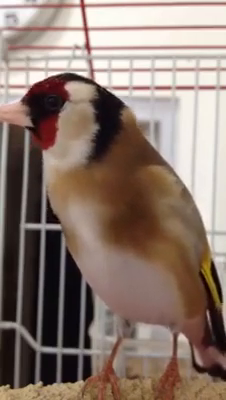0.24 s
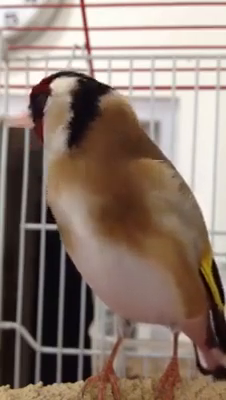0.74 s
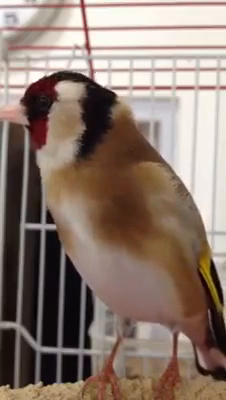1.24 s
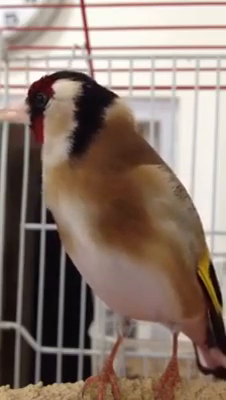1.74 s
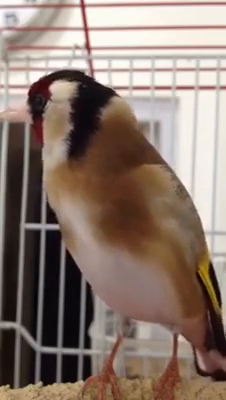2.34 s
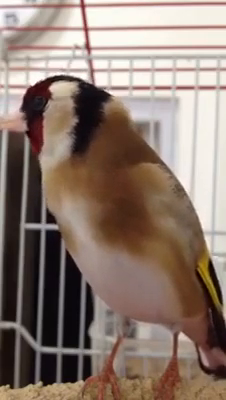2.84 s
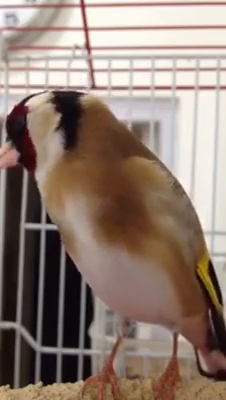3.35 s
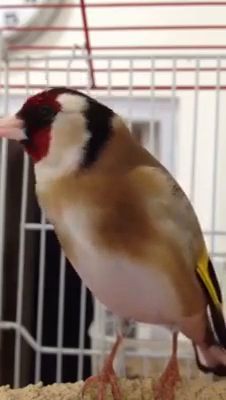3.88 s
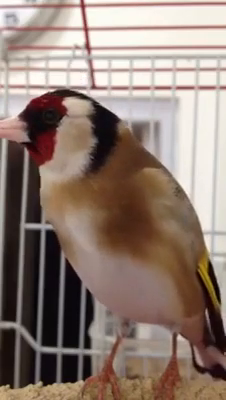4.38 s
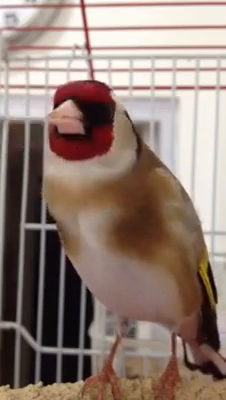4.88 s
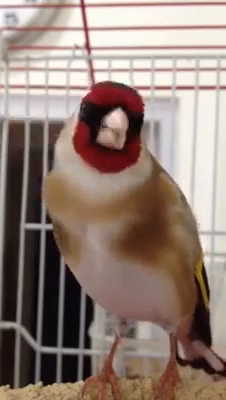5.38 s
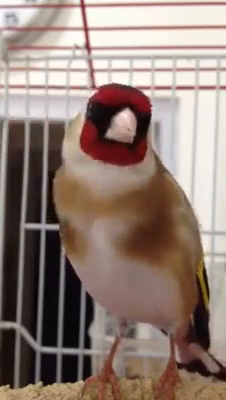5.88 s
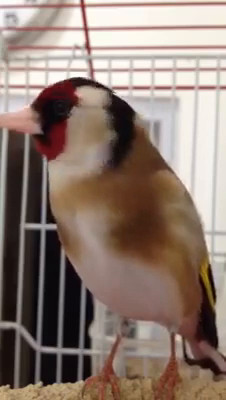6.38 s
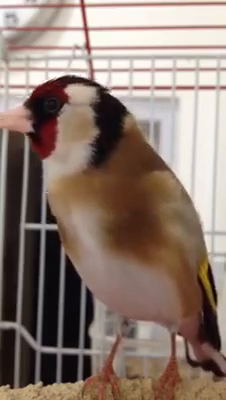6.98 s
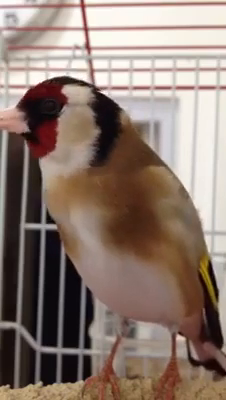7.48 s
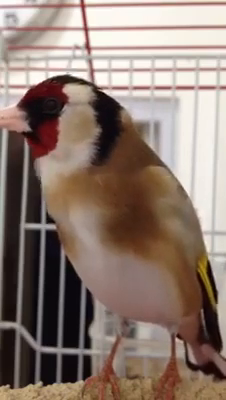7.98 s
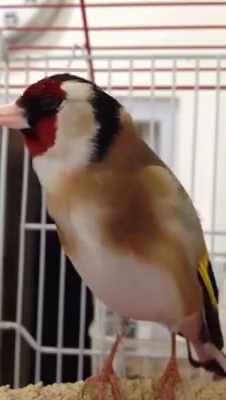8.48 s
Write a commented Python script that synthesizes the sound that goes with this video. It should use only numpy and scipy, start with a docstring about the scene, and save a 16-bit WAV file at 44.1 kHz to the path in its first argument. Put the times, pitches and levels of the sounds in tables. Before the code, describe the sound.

Close to the microphone in a small, hard-walled room, a caged goldfinch sings. A few chirps lead into paired twitters, sliding high whistles, a buzz, fast chattering and whip-like notes. After a sparse pause come a soft mew and creaky rattle, then rising flourishes, quick seesaw chirps, a second buzz and more twittering. Soft room noise and faint low hums lie underneath.

```python
"""Quick gliding whistles, rasps and buzzing trills: a caged goldfinch sings close by in a small room.
Both sides of its syrinx sound: whistles are nearly pure gliding tones, rasps are overtones picked
out by a throat resonance, and trills are fast trains of short chirps. Nearby walls return the notes
as discrete reflections and a decaying tail. Two brief level high tones sound among them. Under all lie
filtered room noise, a faint hiss and two low hums of wavering partials that swell and fade."""
import sys
import numpy as np
from scipy import signal
from scipy.fft import rfft, irfft, next_fast_len
from scipy.io import wavfile

SR = 44100
rng = np.random.default_rng(int(sys.argv[2]) if len(sys.argv) > 2 else 0)


def to_wav(s):
    """Save 16-bit WAV."""
    ch = np.atleast_2d(s).T  # columns
    pcm = np.round(np.clip(ch, -1, 1) * 32767)  # PCM
    wavfile.write(sys.argv[1], SR, pcm.astype(np.int16))


N = 384993
TIME = np.arange(N) / SR

# The strokes of a short rising chirp, sung alone and in pairs; delay_s runs to the loudest moment:
# delay_s, rise_s, fall_s, first_hz, peak_hz, last_hz, level_db, roughness (share of pitch)
WHIT = [(0.00027, .01, .009, 3480, 3950, 4250, 1.5, .012),
        (-.009, .014, .007, 2350, 3400, 3950, -7.5, .045),
        (-.005, .009, .006, 1600, 2900, 4200, -15, 0.063)]


def gain_of(db):
    """Level in decibels as an amplitude ratio."""
    return 10 ** (np.asarray(db) / 20)


def evened(x):
    """Normalization of signal power: scales to rms 1."""
    return x / np.sqrt(np.mean(x ** 2) + 1e-20)


def read(points, hz):
    """Interpolation of a spectrum along a logarithmic frequency axis."""
    f, value = np.transpose(points)
    return np.interp(np.log(hz + 1), np.log(f + 1), value)


def tint(x, points):
    """Linear filtering: weights the spectrum by (frequency_hz, gain_db) points."""
    size = next_fast_len(N + SR, True)
    gain = gain_of(read(points, np.fft.rfftfreq(size, 1 / SR)))
    return irfft(rfft(x, size) * gain, size)[:N]


def add(mix, s, sound):
    """Superposition: adds a sound into the mix from time s on."""
    part = mix[max(round(s * SR), 0):][:len(sound)]
    part += sound[:len(part)]


def wobble(count, hz):
    """Low-passed random motion of about rms 1, weakening above hz."""
    size = next_fast_len(count + 1024, True)
    f = np.fft.rfftfreq(size, 1 / SR)
    lowpass = 1 / np.hypot(1, (f / hz) ** 2)
    return evened(irfft(rfft(rng.standard_normal(size)) * lowpass, size))[:count]


def background(trim_db=0.5, hiss_db=-73):
    """Stationary noise shaped in spectrum: dull room noise that slowly swells, over a white hiss."""
    # Spectrum of the room noise, relative: frequency_hz, density_db (per Hz)
    room_tone = [(30, -32), (70, -17), (120, -10.5), (200, 0), (350, -5), (600, -11), (2500, -20.5),
                 (6000, -34), (10000, -46)]
    # Its swell, before the trim: time_s, level_db
    room_swell = [(0, -51), (2.2, -46), (3.7, -50), (5, -44.5), (5.9, -48.5), (7.7, -41.5), (8.73, -41.5)]
    noise = evened(tint(rng.standard_normal(N), room_tone))
    level_db = np.interp(TIME, *np.transpose(room_swell)) + trim_db
    hiss = gain_of(hiss_db) * rng.standard_normal(N)
    return noise * gain_of(level_db) + hiss


def last_ring(hz=4700, width_hz=400, db=-43, t60=1.0):
    """Exponential decay of a narrow noise band: the room still rings from an earlier phrase."""
    ring = wobble(N, width_hz) * np.sin(2 * np.pi * hz * TIME)
    return np.sqrt(2) * ring * gain_of(db - 60 * TIME / t60)


def gesture(rise, fall, first_hz, peak_hz, last_hz, rough,
            core=0.36, jitter_hz=700, flutter=11, hold=.7, level_span=.015):
    """Frequency and amplitude modulation, as by one push of air: swell, gliding pitch and phase."""
    t = np.arange(-rise, fall, 1 / SR)
    u = np.where(t < 0, t / rise, t / fall)  # -1 at the start, 0 at the loudest, 1 at the end

    # a level tone stays even, a glide peaks briefly
    width = core + hold * np.exp(-abs(np.log(last_hz / first_hz)) / level_span)
    swell = (1 - u ** 8) / (1 + (u / width) ** 2)

    shake = np.tanh(flutter * rough)  # a rough voice also flutters in strength
    swell = swell * (1 + shake * wobble(len(t), jitter_hz / 2)) / np.hypot(1, shake)

    glide = np.interp(u, [-1, 0, 1], [first_hz, peak_hz, last_hz])
    hz = glide * (1 + rough * wobble(len(t), jitter_hz))
    return np.sqrt(2) * swell, glide, 2 * np.pi * np.cumsum(hz) / SR


def overtones(hz, phase, colour, count):
    """Harmonic series above the fundamental, each partial as strong as colour(Hz) says."""
    return sum(colour(k * hz) * (k * hz < SR / 2) * np.sin(k * phase) for k in range(2, count + 1))


def whistle(s, rise, fall, first_hz, peak_hz, last_hz, db, rough, overtone_db=-32, air_db=-42,
            rough_air=.5, half_db=-45, bright_hz=4700, bright_db=11):
    """Nearly sinusoidal glide with a subharmonic; high notes gain overtones, rough notes leak hiss."""
    swell, hz, phase = gesture(rise, fall, first_hz, peak_hz, last_hz, rough)
    brightness = np.clip(4 * np.log2(hz / bright_hz), 0, 1)  # full a quarter octave above bright_hz
    overtone = gain_of(overtone_db + bright_db * brightness)
    half_pitch = gain_of(half_db) * np.sin(phase / 2)
    tone = np.sin(phase) + half_pitch + overtones(hz, phase, lambda f: overtone, count=4)
    air = (gain_of(air_db) + rough_air * rough) * rng.standard_normal(len(hz))
    return s - rise, gain_of(db) * swell * (tone + air)


def rasp(s, rise, fall, first_hz, peak_hz, last_hz, db, rough, throat_hz, width_hz=650,
         root_db=-3.5, octave_db=8, top_db=-33, rough_air=.95):
    """Source and resonator: the syrinx claps shut each cycle, the throat picks out overtones."""
    swell, hz, phase = gesture(rise, fall, first_hz, peak_hz, last_hz, rough, core=0.42)
    spread_hz = width_hz * (1 + 20 * rough)

    def throat(f):
        """Resonance curve over a weak floor."""
        return 1 / (1 + ((f - throat_hz) / spread_hz) ** 2) + gain_of(top_db)

    # the fundamental escapes the better, the higher it lies and the broader the resonance
    root_gain = gain_of(root_db + octave_db * np.log2(hz / throat_hz)) * np.sqrt(spread_hz / width_hz)
    air = rough_air * rough * rng.standard_normal(len(hz))
    tone = root_gain * np.sin(phase) + overtones(hz, phase, throat, count=11) + air
    return s - rise, gain_of(db) * swell * evened(tone) / np.sqrt(2)


def note(strokes, s, db, pitch_hz=None, length=1, bend=.6):
    """Superposed strokes, stretched and transposed together; rough strokes never bend twice alike."""
    shift = pitch_hz / strokes[0][4] if pitch_hz else 1  # the first stroke then peaks at pitch_hz
    for delay, rise, fall, first_hz, peak_hz, last_hz, stroke_db, rough, *throat in strokes:
        voice = rasp if throat else whistle
        start, end = shift * (1 + bend * rough * rng.standard_normal(2))
        yield voice(s + delay * length, rise * length, fall * length,
                    first_hz * start, peak_hz * shift, last_hz * end, db + stroke_db, rough, *throat)


def single_notes():
    """Transposition of gestures: each note at its own pitch and length, some kinds sung only once."""
    # The strokes of each kind of note, overlapping where both sides of the syrinx sound:
    # delay_s, rise_s, fall_s, first_hz, peak_hz, last_hz, level_db (on the note's level),
    # roughness (share of pitch), and for rasps throat_hz
    hook = [(0, .012, .022, 2700, 3800, 4000, 0, .015), (-.011, .014, .006, 1700, 2350, 3200, -11, .02)]
    croon = [(0, .05, .042, 2290, 2440, 2520, .5, .02), (-.003, .04, .04, 4650, 4700, 5000, -10, .04)]
    peal = [(0, .022, .036, 4400, 5080, 5560, 0, 0.031), (-.018, .008, .011, 3200, 4200, 5300, -1, .035),
            (-.016, .007, 0.02, 5750, 5400, 5350, -2.5, 0.024)]
    slur = [(0.00048, .052, .058, 4500, 3250, 2680, 0, 0.029)]
    whip = [(0.00014, .011, .016, 3050, 4110, 5600, 1.5, .028),
            (-.008, .008, .006, 1387, 3000, 4300, -14, .07),
            (.019, .017, .04, 5100, 4620, 5350, -8.5, .035)]
    peep = [(0, .018, .021, 1930, 2780, 3150, 0, .022)]
    squeak = [(-0.00029, .018, 0.022, 5650, 5450, 5450, 0, .045),
              (-0.00086, 0.0088, 0.014, 7700, 7300, 6600, -6.5, .022),
              (0, .012, .014, 6200, 6000, 5950, -9, .015, 12000)]
    tink = [(0, .01, 0.012, 5370, 3743, 3380, -0.051, 0.0042),
            (.001, .01, .019, 5000, 5610, 5220, -2.2, .023)]
    slide = [(0, .024, .02, 1950, 2609, 3200, 0, .008),
             (-.03, .034, .022, 1500, 1980, 2300, -12.5, .005, 3200),
             (.066, .044, .05, 3000, 3780, 5000, -9, .05)]
    mew = [(0, 0.084, 0.07, 1475, 2000, 2083, 0, .002, 4020),
           (-0.11, 0.011, .04, 1230, 1275, 1560, -5, .029, 4000),
           (.057, .049, 0.04, 2010, 2113, 2164, .5, 0.0029, 3860)]
    chuck = [(-0.00029, .012, .017, 3950, 4000, 2760, 0, 0.055),
             (-.003, .008, 0.0056, 1400, 3000, 4300, -11.5, 0.074)]
    upper_step = [(0, .018, 0.016, 4400, 4720, 4800, 0, .04),
                  (-.006, .012, .016, 4700, 4350, 4200, -6, .03)]
    lower_step = [(0, .018, .009, 3300, 3850, 4020, 1, 0.0081)]
    zit = [(0, .005, 0.014, 7400, 8000, 8000, 0, 0.1)]
    # When and how each kind is sung: time_s, level_db, pitch_hz (first stroke's peak), length_factor
    hooks = [(.662, -13.5, 3800, 1)]
    whits = [(.907, -14.5, 4030, 1.4), (8.088, -8.5, 3950, 1.2)]
    croons = [(1.524, -21, 2437, 1), (8.708, -16.5, 2437, 1)]
    peals = [(1.626, -9.5, 4556, 1.01), (1.806, -9, 5126, 1), (1.988, -10, 5146, 1.1)]
    slurs = [(1.729, -25, 3117, 1.1), (1.891, -20.5, 3350, 1)]
    whips = [(2.964, -11, 3945, 1.31), (3.197, -7.5, 4170, 0.91), (3.418, -8, 4110, 1)]
    peeps = [(3.074, -21, 2820, 1.12), (3.309, -20.5, 2765, 0.93), (8.211, -22.5, 3250, 1.8)]
    squeaks = [(3.145, -18, 5300, 0.98), (3.368, -15.5, 5570, 1.1), (7.249, -16.5, 5650, .9)]
    tinks = [(3.64, -12.5, 3790, 0.83), (3.704, -11, 3776, 1.02), (3.77, -11.5, 3684, 1.1),
             (3.841, -9, 3790, 1.09)]
    slides = [(4.284, -23, 2610, 1)]
    mews = [(4.733, -23.5, 2002, 1)]
    chucks = [(6.897, -14.5, 3930, 1.13), (7.106, -8.5, 4180, 0.77), (7.306, -14, 4035, 1.1)]
    upper_steps = [(6.954, -14.5, 4600, 1.13), (7.171, -12, 4720, 1), (7.365, -11, 4950, .9)]
    lower_steps = [(6.989, -5.5, 3820, 1), (7.184, -10.5, 3450, 0.98), (7.391, -5.5, 4014, .9)]
    zits = [(7.028, -19, 7800, 1), (7.229, -21, 8400, 1.2)]
    for strokes, rows in [(hook, hooks), (WHIT, whits), (croon, croons), (peal, peals),
                          (slur, slurs), (whip, whips), (peep, peeps), (squeak, squeaks),
                          (tink, tinks), (slide, slides), (mew, mews), (chuck, chucks),
                          (upper_step, upper_steps), (lower_step, lower_steps), (zit, zits)]:
        for row in rows:
            yield from note(strokes, *row)


def paired_notes():
    """Repetition of two-note syllables in runs, the second note a short gap after the first."""
    # The strokes of each note in a pair: delay_s, rise_s, fall_s, first_hz, peak_hz, last_hz,
    # level_db (on the note's level), roughness (share of pitch), and for rasps throat_hz
    chip = [(0.00027, .007, .005, 6100, 4100, 2800, 0.0021, .075),
            (-.001, .005, .012, 5600, 5350, 4700, -8.5, .07), (0, .006, .012, 7900, 7700, 7400, -23, .06)]
    chip_echo = [(0, .012, .017, 5100, 3860, 3280, 0, .03), (-.004, .008, .01, 3100, 2850, 2600, -15, .08)]
    sweep = [(-0.00017, .02, .03, 2650, 3950, 4750, .3, .026),
             (-.012, .011, .006, 1300, 2900, 4300, -9.5, .06),
             (.012, .016, .02, 4750, 4620, 4700, -9, .018)]
    lilt = [(0, .012, .018, 3050, 3380, 3900, 0.0031, 0.022)]
    scrape = [(0, .028, .024, 1780, 3100, 3850, 0, 0.092, 5500)]
    peak = [(0, .022, 0.012, 3007, 4494, 5550, 0, .025), (.011, .005, 0.0209, 4890, 3380, 2565, -8, 0.024),
            (.029, .007, .018, 4900, 3220, 2500, -9, .01)]
    tsip = [(0, .007, .019, 5250, 5000, 4940, 0, .04), (-.004, .004, .01, 7700, 7200, 6200, -11.5, .09),
            (-.003, .005, .009, 6200, 5850, 5600, -16, .04, 11800)]
    # The runs: time_s, first_level_db, gap_s (to the second note), second_level_db
    chatters = [(.748, -14.5, .011, -25), (2.41, -6.5, .016, -7.5), (2.473, -7.5, .016, -8),
                (2.538, -7, 0.014, -15), (2.598, -10, .015, -12), (2.659, -8, .018, -17),
                (2.721, -6, .019, -6.5), (2.786, -6, .016, -5.5), (2.857, -15, .017, -10.5)]
    twitters = [(1.025, -15.5, 0.032, -20.5), (1.118, -16, .036, -21), (1.214, -15, 0.03, -19.5),
                (1.305, -16.5, .027, -19.5), (1.396, -15, .03, -18.5), (8.298, -12.5, 0.034, -14.5),
                (8.393, -14, .029, -12.5), (8.482, -12, 0.033, -13.5), (8.579, -11.5, 0.033, -13.5)]
    flourishes = [(5.292, -29, 0.024, -8.5), (5.438, -15.5, .024, -8.5), (5.584, -19.5, .025, -9),
                  (5.73, -21.5, .026, -9)]
    seesaws = [(6.171, -11.5, .024, -13.5), (6.264, -8, .033, -13), (6.356, -7, .029, -15),
               (6.447, -9, .025, -13.5), (6.532, -9.5, .034, -9), (6.63, -7, .029, -7),
               (6.721, -11, .03, -8.5)]
    for first, second, rows in [(chip, chip_echo, chatters), (sweep, lilt, twitters),
                                (scrape, peak, flourishes), (WHIT, tsip, seesaws)]:
        for s, first_db, gap, second_db in rows:
            yield from note(first, s, first_db)
            yield from note(second, s + gap, second_db)


def room(x, near_db=-8, near_t60=.12, tail_db=-14.0, gap=0.0023):
    """Convolution with an impulse response: close reflections, then the longer ring of the room."""
    # Colour of the reflected against the direct sound: frequency_hz, gain_db
    room_colour = [(2800, 2), (3900, -2), (4700, 0.5), (6000, -2), (7500, 0.5)]
    # Reverberation time of the tail: frequency_hz, t60_s
    room_t60 = [(1500, 0.64), (4200, 0.93), (8000, 0.56), (14000, 0.5)]
    t = TIME[:SR]
    # about 1000 reflections a second, of random sign
    taps = rng.choice([-1., 1.], SR) * (rng.random(SR) < 1000 / SR) * (t > gap)
    near = taps * gain_of(-60 * t / near_t60)

    # noise that decays in each frequency band at its own rate
    hz, at, bands = signal.stft(rng.standard_normal(SR) * (t > 2 * gap), SR, nperseg=256)
    decay = gain_of(-60 * at / read(room_t60, hz)[:, None])
    tail = signal.istft(bands * decay, SR, nperseg=256)[1][:SR]

    echo = gain_of(near_db) * near / np.linalg.norm(near) + gain_of(tail_db) * tail / np.linalg.norm(tail)
    return x + signal.fftconvolve(tint(x, room_colour), echo)[:N]


def buzz(rows, scatter_db=1.8, scatter_s=.0003):
    """Pulse repetition heard as a buzz: a slightly uneven fast train of clusters of short chirps."""
    # The strokes in one pulse, relative to the pulse:
    # delay_s, rise_s, fall_s, first_hz, peak_hz, last_hz, level_db, roughness (share of pitch)
    pulse = [(.002, .003, .004, 4600, 4100, 3550, 2, .04), (.006, .007, .008, 5600, 4800, 4150, -5, .07),
             (.0005, .005, .006, 3000, 2550, 3400, -9, .04),
             (.007, .005, .005, 3000, 3700, 4400, -8.5, .05)]
    times, rates, levels = np.transpose(rows)
    out, s = np.zeros(N), times[0]
    while s < times[-1]:
        for delay, *shape, db, rough in pulse:
            level_db = np.interp(s, times, levels) + db + scatter_db * rng.standard_normal()
            stroke_s = s + delay + scatter_s * rng.standard_normal()
            add(out, *whistle(stroke_s, *shape, level_db, rough))
        s += 1 / np.interp(s, times, rates)
    return out


def hum(rows, hz, partials, waver=0.0117):
    """Additive synthesis of a wavering low drone, like a distant engine; partials are (multiple, dB)."""
    phase = 2 * np.pi * np.cumsum(hz * (1 + waver * wobble(N, 8.7))) / SR
    level = gain_of(np.interp(TIME, *np.transpose(rows), left=-100, right=-100))
    return np.sqrt(2) * level * sum(gain_of(db) * np.sin(k * phase) for k, db in partials)


def rattle():
    """Resonance in succession: a row of arched creaks, each with its own throat resonance."""
    # Pitch arch of every creak: first_hz, peak_hz, last_hz
    arch = (1500, 2480, 1800)
    # The creaks: time_s, level_db, half_length_s, roughness (share of pitch), throat_hz
    creaks = [(4.916, -18.5, .018, .035, 4200), (4.951, -19.5, .016, .05, 4400),
              (4.984, -17, .014, .04, 4550), (5.021, -18, .02, .1, 4500), (5.055, -14, .015, .085, 5800),
              (5.086, -16.5, .02, .08, 5100), (5.122, -19.5, .022, .09, 4700)]
    for s, db, half, rough, throat_hz in creaks:
        yield rasp(s, half, half, *arch, db, rough, throat_hz)


def finch(lowest_hz=1300):
    """Radiation from a small source: the whole song, high-passed as so small a body gives no bass."""
    # Two buzzing trills, each a list of rows: time_s, pulse_rate_hz, level_db
    trills = [
        [(2.052, 91, -19), (2.105, 90, -21), (2.17, 84, -17.5), (2.26, 85, -12.5), (2.305, 84, -15),
         (2.322, 84, -22)],
        [(7.625, 105, -21), (7.67, 95, -19), (7.715, 88, -22), (7.775, 90, -16), (7.848, 90, -17.5)],
    ]
    song = sum(buzz(rows) for rows in trills)
    for voices in (single_notes(), paired_notes(), rattle()):
        for s, sound in voices:
            add(song, s, sound)
    return signal.sosfilt(signal.butter(4, lowest_hz, "high", fs=SR, output="sos"), song)


def steady_tones():
    """Constant frequency under a brief even swell: short level high tones."""
    # The tone's shape: delay_s, rise_s, fall_s, first_hz, peak_hz, last_hz, level_db, roughness
    steady_tone = [(0, .012, .011, 6050, 6050, 6050, 0, .005)]
    # When and how it sounds: time_s, level_db, pitch_hz, length_factor
    tone_times = [(6.832, -22, 8760, 2.2), (7.055, -8, 6050, 1)]
    tones = np.zeros(N)
    for row in tone_times:
        for s, sound in note(steady_tone, *row):
            add(tones, s, sound)
    return tones


def scene():
    """Superposition of sources: bird and steady tones in the room, the background and the drones."""
    # Uneven treble colour: frequency_hz, gain_db
    treble_colour = [(5600, 0), (6700, -1), (7900, 4.5), (9100, -5), (10800, 6.5), (12200, -5.5),
                     (13600, 1)]
    # Swell of each hum, before the levels of its partials: time_s, level_db
    high_swell = [(4.5, -59), (4.7, -41.5), (4.85, -37.5), (5.02, -41), (5.15, -52)]
    low_swell = [(5.2, -57), (5.7, -49.5), (6.0, -58), (7.2, -47.5), (7.75, -30.5), (8.2, -41),
                 (8.73, -48.5)]
    high_hum = hum(high_swell, 146.5, [(.5, -17.5), (1, 1.0), (1.5, -7), (2, -8)])
    low_hum = hum(low_swell, 119.7, [(1, -3), (2, -10.0), (2.5, -12.5)], waver=0.00373)
    in_room = tint(room(finch() + steady_tones()), treble_colour)
    return (in_room + last_ring() + background() + high_hum + low_hum)[None]


def record(dry, edge_hz=15050):
    """Saturation and band limiting: peaks beyond .92 clip, then a steep low-pass cuts the treble."""
    lowpass = signal.firwin(511, edge_hz, window=("kaiser", 9), fs=SR)
    return signal.oaconvolve(np.clip(dry, -.92, .92), lowpass[None], "same")


dry = scene()
out = record(dry)
to_wav(out)
```